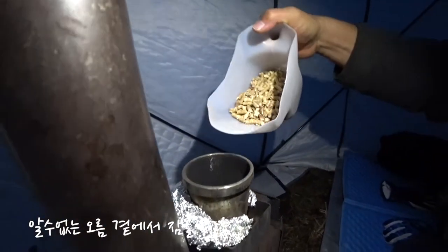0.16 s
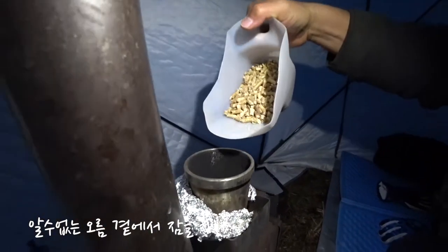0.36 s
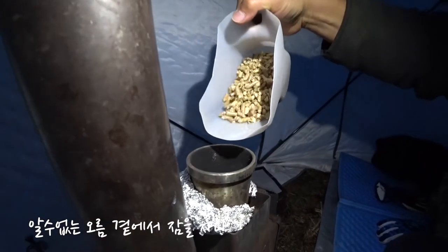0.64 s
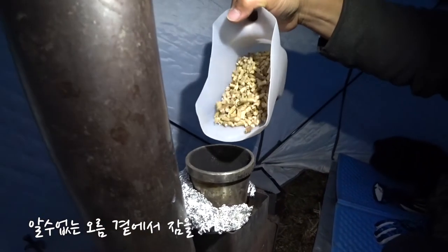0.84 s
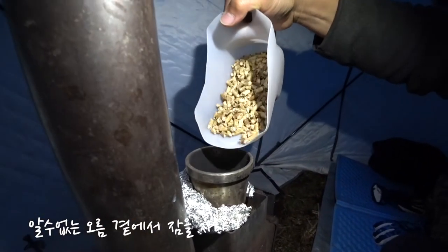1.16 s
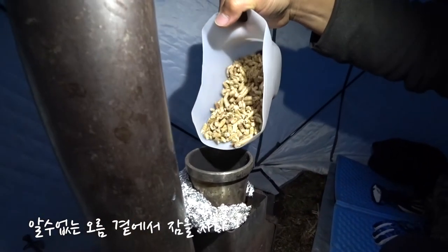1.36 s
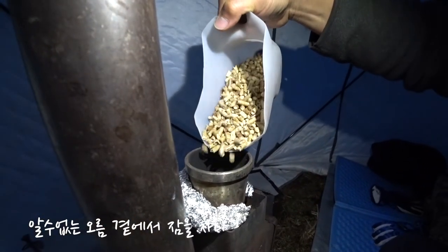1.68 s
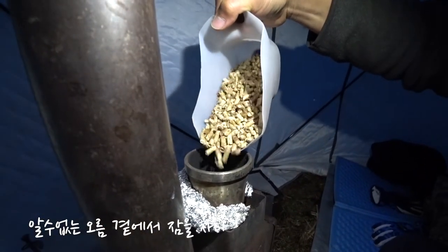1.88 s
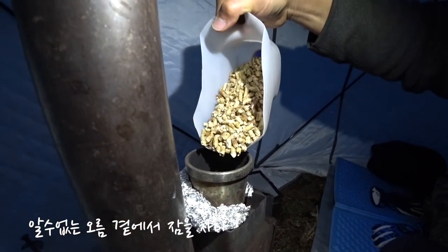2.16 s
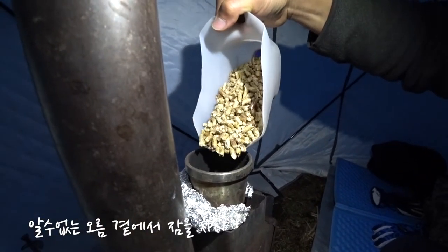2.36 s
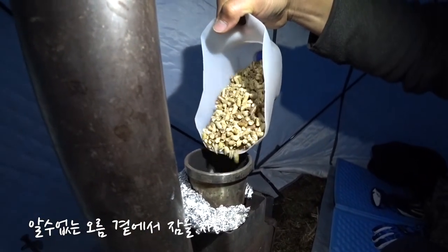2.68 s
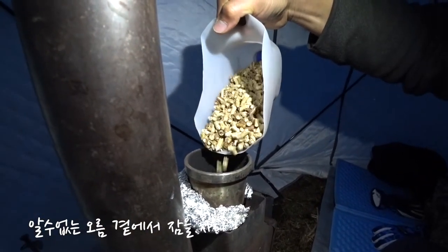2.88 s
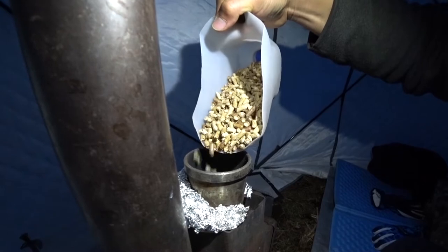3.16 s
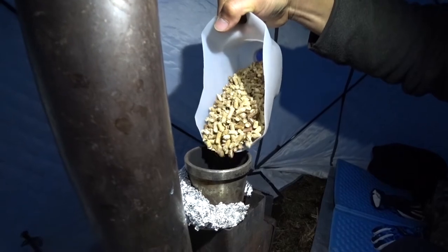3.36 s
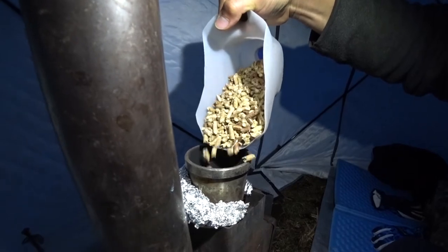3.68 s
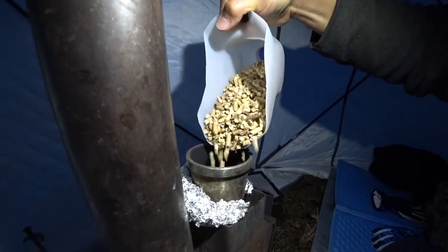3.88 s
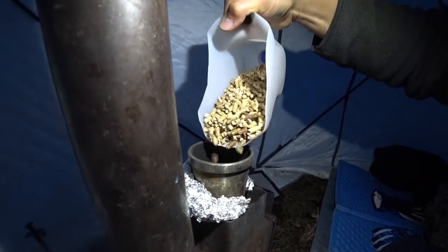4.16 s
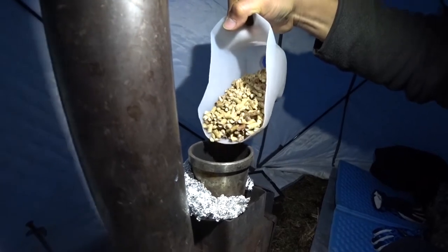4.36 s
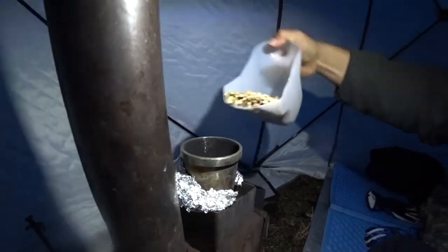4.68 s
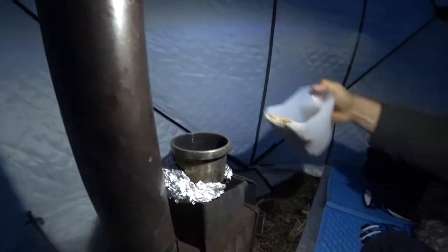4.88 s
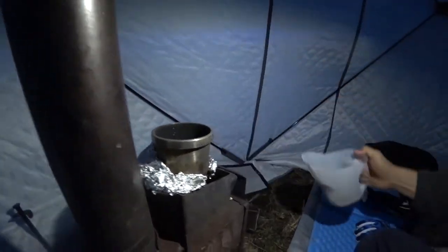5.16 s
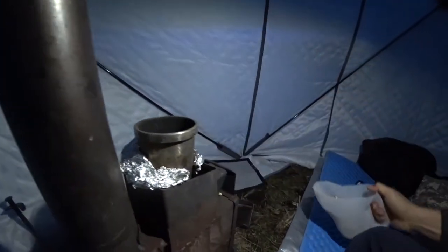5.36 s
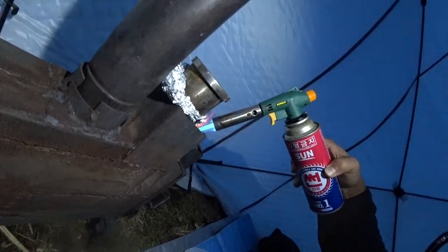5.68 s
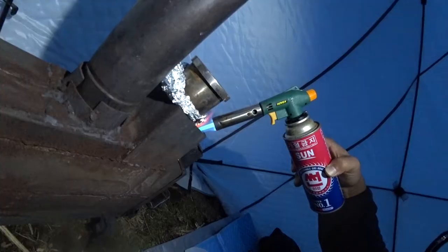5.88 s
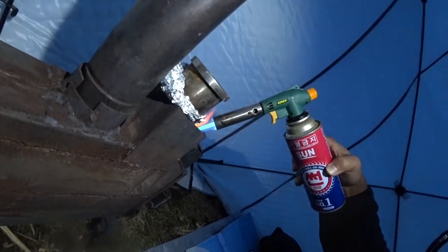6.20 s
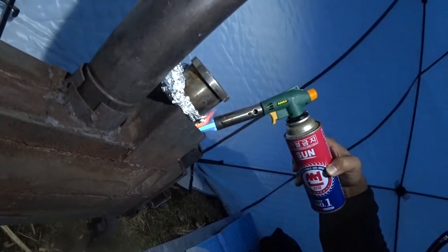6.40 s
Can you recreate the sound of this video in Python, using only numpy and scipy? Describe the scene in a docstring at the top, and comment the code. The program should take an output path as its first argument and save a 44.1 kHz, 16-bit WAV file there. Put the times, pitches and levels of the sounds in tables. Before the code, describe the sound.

Inside a small cloth tent, close to a small camera microphone with a wide stereo spread, the quiet is a soft airy noise with very faint thin whines. From about 0.1 s a few wood pellets tick in a plastic scoop; between 0.6 and 1.6 s they slide and clack more busily, dry and hollow. At 1.7 s they begin dropping into a steel feed tube: bright, irregular pings and ticks, densest from about 1.9 to 3.3 s with a brief lull near 2.3-2.5 s, over rustling plastic and low, short metallic landings in the stove box. The drops continue more sparsely to about 4.5 s, with a last one near 4.8 s. From 4.9 to 5.4 s the remaining load swishes back with a slight hollow boom. Soft faint knocks follow around 5.6-5.8 s, and a gas torch hisses weakly and steadily from 5.7 s to the end, with another tiny knock near 6.35 s.

```python
"""Inside a small tent: wood pellets shift and slide in a plastic scoop, close to a small camera microphone.
They drop one after another into the steel feed tube of a stove and land in its box; each blow rings
the modes of plastic, tube or box. The scoop is tipped back and set down with soft hollow knocks,
then a gas torch, made of resonant noise, hisses faintly. Faint whines lie in the quiet, the cloth walls
return a short faint scatter, and the microphone spreads the sound wide by phase."""
import sys
import numpy as np
from scipy import signal
from scipy.fft import rfft, irfft
from scipy.io import wavfile
from scipy.ndimage import uniform_filter1d

SR = 44100
rng = np.random.default_rng(int(sys.argv[2]) if len(sys.argv) > 2 else 0)


def to_wav(sig):
    """Store sig (one row per channel, or 1-D mono) as 16-bit WAV at the path in sys.argv[1].

    Samples outside -1..1 are clipped; the rate is SR.
    """
    pcm = np.clip(np.atleast_2d(sig), -1, 1) * 32767
    pcm = np.round(pcm).astype(np.int16)
    wavfile.write(sys.argv[1], SR, pcm.T)  # frames by channels


N = 287973
HZ = np.fft.rfftfreq(N, 1 / SR)
T = np.arange(N) / SR

# All levels are relative; blows are shared among the modes they ring.
# small pellets pattering down the tube: [t/s, level/dB of the smallest tap]
STREAM_LEVEL = [(1.68, -46.5), (2.07, -46), (2.24, -48), (2.3, -55.5), (2.58, -49), (2.66, -37),
                (2.88, -38), (2.98, -39), (3.3, -39.5), (3.9, -44), (4.04, -45.5), (4.1, -43), (4.2, -42.5),
                (4.42, -39.5), (4.52, -61)]
# pellets striking the tube wall: [t/s, level/dB, f/Hz favoured by the spot]
TUBE_STRIKES = [(1.718, -21, 3240), (1.743, -14.5, 7000), (1.855, -20.5, 5850), (1.887, -24, 4300),
                (1.9037, -26, 4160), (1.9596, -12, 8570), (2.025, -15.5, 6750), (2.041, -21, 1480),
                (2.0448, -28, 6250), (2.064, -16, 3010), (2.086, -12, 7500), (2.119, -17, 6200),
                (2.1234, -16, 8500), (2.154, -14.5, 8400), (2.2017, -22.5, 6000), (2.2305, -20, 3800),
                (2.329, -31.5, 4100), (2.3282, -26.5, 2550), (2.479, -30.5, 3330), (2.5578, -23, 4700),
                (2.6132, -11, 8900), (2.645, -15.5, 7700), (2.6574, -10.5, 4750), (2.69, -22, 8240),
                (2.7481, -21.5, 8700), (2.761, -15.5, 8500), (2.7932, -14, 6430), (2.815, -15, 8600),
                (2.825, -15, 11400), (2.853, -28.5, 8800), (2.874, -22.5, 4750), (2.935, -29, 8830),
                (2.957, -26, 4800), (2.988, -45, 8600), (3.0402, -14.5, 11100), (3.103, -24.5, 6350),
                (3.109, -19.5, 8800), (3.1613, -25.5, 12000), (3.1686, -17.5, 6540), (3.1949, -25, 9900),
                (3.245, -22, 4460), (3.279, -25.5, 8400), (3.317, -23, 11300), (3.323, -19.5, 8450),
                (3.3492, -27, 8300), (3.375, -28, 6750), (3.4461, -24.5, 4470), (3.484, -16, 8130),
                (3.532, -20.5, 6600), (3.5705, -23.5, 4770), (3.6347, -18.5, 4840), (3.663, -22.5, 8260),
                (3.695, -24, 11300), (3.728, -20.5, 8240), (3.761, -23.5, 9000), (3.837, -24, 8700),
                (3.8684, -21, 6550), (3.903, -23.5, 7300), (3.9714, -25.5, 3110), (3.9966, -23, 8700),
                (4.06, -33, 4840), (4.219, -42, 7200), (4.31, -30, 2250), (4.122, -18.5, 5130),
                (4.268, -28, 4830), (4.308, -31, 4800), (4.396, -26.5, 7340), (4.437, -16.5, 6600),
                (4.4732, -15.5, 4550), (4.6492, -40, 8900), (4.678, -37.5, 2260), (4.737, -44.5, 7000),
                (4.8096, -28, 4900)]
# main modes of the feed tube: [f/Hz, level/dB, t60/s]
TUBE_MODES = [(1478, -9, .06), (2250, -10, .13), (3016, -7, .14), (2550, -5, .07), (3102, -12, .6),
              (3215, -11, .14), (3365, -6, .1), (3720, -6, .1), (4110, -3.5, .12), (4280, -8, .25),
              (4345, -5, .1), (4735, -8, .12), (4840, -8, .12), (5350, -6, .1), (5604, -10, .12),
              (6378, -4, .1), (6665, -8, .12), (7260, -8, .09), (7835, -8, .09), (8065, -6, .1),
              (8302, -6, .1), (8819, -4, .18), (9126, -12, .09), (9880, -8, .06), (11300, -2, .07),
              (11560, -5, .05)]
# outline of its many lesser modes: [f/Hz, level/dB, t60/s]
STEEL_OUTLINE = [(1187, -21, 0.25), (2830, -18, 0.17), (4560, -8.5, 0.066), (6970, -2.5, 0.041),
                 (10760, -7.5, 0.039), (15613, -21.5, 0.048)]
# pellets sliding in the scoop, first tilt to setting down: [t/s, level/dB of the smallest tick]
SLIDE_LEVEL = [(.05, -83), (.27, -59.5), (.33, -55), (.49, -53.5), (.57, -57), (.62, -52), (.8, -49),
               (1.1, -53), (1.25, -50.5), (1.4, -49), (1.7, -50.5), (2.07, -47.5), (2.25, -51), (2.38, -54),
               (2.44, -52), (2.54, -52), (2.63, -48.5), (3.2, -50), (3.95, -50), (4.09, -55), (4.3, -49.5),
               (4.55, -56), (4.85, -56), (4.92, -48), (5.08, -46.5), (5.2, -47.5), (5.29, -53),
               (5.37, -55.5), (5.41, -89)]
# single pellets clacking on the scoop: [t/s, level/dB, treble against it/dB, f/Hz favoured by the spot]
SCOOP_CLACKS = [(0.0962, -30.5, -28.5, 1300), (0.146, -34.5, -36, 1160), (0.2462, -39.5, -11, 3150),
                (0.2868, -27, -37, 2820), (0.4446, -40, -8, 2900), (0.497, -30, -20, 1090),
                (0.606, -22, -18, 1120), (.6548, -34, -10, 2900), (0.6784, -28, -7, 1220),
                (0.698, -39, 12, 2100), (0.7204, -36.5, 16, 5070), (0.724, -25.5, 2.5, 2980),
                (0.765, -24, -2.5, 1680), (0.7876, -37.5, 37, 2920), (0.8075, -17, -15.5, 1750),
                (0.845, -28.5, -7, 3070), (0.8746, -30, -8, 1690), (.916, -27.5, 9, 2860),
                (0.954, -19.5, -15, 1180), (0.984, -20, -7, 2200), (1, -40, 25, 2740),
                (1.0237, -20.5, -21, 1910), (1.0526, -29, 1, 5300), (1.0732, -29.5, -4, 4600),
                (1.0978, -27.5, -8, 2520), (1.1151, -22, -11, 2290), (1.1338, -22.5, -18, 3100),
                (1.151, -30, -11, 2980), (1.159, -22.5, 11, 3620), (1.206, -20, -39, 560),
                (1.3937, -17, -35, 3240), (1.4383, -21, -15, 1190), (1.4715, -15, -36, 3050),
                (1.5047, -20, -16, 2830), (1.534, -19.5, -20, 1150), (1.6728, -16, -21, 1170),
                (5.017, -32, 5, 2660), (5.039, -35, 10, 3500), (5.07, -30, 8, 2720), (5.081, -30, 18, 2460),
                (5.109, -24, 3.5, 2610), (5.1602, -24.5, 1, 3800), (5.219, -22, -20, 2530),
                (5.3166, -40, 31.5, 3860), (5.3516, -34.5, 12, 3170), (5.368, -32, 0.5, 1480)]
# outline of the scoop modes: [f/Hz, level/dB, t60/s]
PLASTIC_OUTLINE = [(340, -40, 0.035), (482, -10.5, 0.043), (1060, -6.5, 0.036), (2770, -4.5, 0.033),
                   (3900, -4.5, 0.016), (7380, -1, 0.013), (15700, -26.5, 0.0094)]
# the bowl booming as the load slides back: [t/s, level/dB]
BOOM_LEVEL = [(4.86, -71), (4.92, -53), (5.06, -58), (5.11, -55), (5.17, -47.5), (5.21, -58.5), (5.26, -54),
              (5.33, -79)]
# pellets landing in the stove box: [t/s, level/dB, f/Hz favoured by the spot]
BOX_LANDINGS = [(2.017, -28, 743), (2.124, -39, 820), (2.232, -35, 1077), (2.479, -33.5, 980),
                (2.695, -31, 745), (2.797, -37, 980), (2.86, -40, 765), (2.983, -35, 785),
                (3.065, -29, 720), (3.195, -28.5, 830), (3.267, -38, 810), (3.376, -37.5, 845),
                (3.542, -31.5, 830), (3.642, -26, 770), (3.874, -31, 823), (4.125, -32, 980),
                (4.187, -27.5, 764), (4.278, -29, 790), (4.337, -38.5, 795), (4.476, -36.5, 1077),
                (4.683, -39.5, 800), (4.813, -36.5, 826)]
# modes of the box: [f/Hz, level/dB, t60/s]
BOX_MODES = [(600, -12, .07), (726.5, -5, .24), (745, -6, .2), (772, -5, .1), (805, -8, .45),
             (826, -5, .15), (872, -3, .1), (985, -4, .07), (1077, -11, .7)]
# soft hollow knocks: [t/s, level/dB, f/Hz, rustle against it/dB]
SOFT_KNOCKS = [(0.327, -50.5, 830, -10), (5.625, -53.5, 810, 0), (5.672, -57, 490, -12),
               (5.701, -62.5, 1566, 3), (5.762, -50, 856, -22), (5.802, -56.5, 496, -21),
               (6.352, -50, 866, -26), (6.394, -56.5, 716, -22)]
# torch nozzle whistles and broad hiss: [f/Hz, width/Hz, level/dB]
TORCH_JET = [(3030, 190, -72), (5220, 440, -83), (6810, 480, -81.5), (4970, 8100, -79)]
# spectrum of the quiet in the tent: [f/Hz, level/dB per hertz]
AIR_SPECTRUM = [(25, -15), (60, -21.5), (110, -1.5), (150, -1.5), (200, -5), (500, -4), (900, -6),
                (1500, -8.5), (2300, -12.5), (4500, -19), (9000, -20.5), (16000, -19)]
# faint steady whines: [f/Hz, width/Hz, level/dB]
WHINE_TONES = [(1200, 85, -76.5), (9900, 100, -87.5), (12300, 70, -85)]
# channel difference against channel sum: [f/Hz, level/dB, phase lead/rad]
PORT_SPREAD = [(59.4, -10, 1.8), (140, -5.5, 2.4), (291, 3, 2.04), (580, 7.5, 1.88), (1240, 9.5, 1.83),
               (2376, 6.5, 1.78), (4780, 2.5, 1.93), (9600, -2.5, 2.13), (16000, -7, 2.14)]

# a harder strike is a shorter contact, so the lower modes gain less than the upper ones
FIRM_DB, FIRM_LOW_DB, LOW_PER_DB, PATTER_LOW_DB = -28.5, -1, -0.2877, -4.5
# a pellet is a short rod: after one end strikes, the other slaps down a moment later
SLAP_MIN_S, SLAP_MAX_S, SLAP_DB, SLAP_LUCK_DB = .003, .014, -9, 3.
# a tube is never quite round: each mode has a shorter twin a little off in pitch
TWIN_SPLIT, TWIN_DECAY, TWIN_DB = 0.0114, 0.61, -2
# the faster the slide, the brighter; brighter during the pour, when steel rattle from the tube mixes in
BRISK_DB, BRISK_TREBLE_DB, TREBLE_PER_DB, POUR_TREBLE_DB = -46.5, -1.5, 3.5, 10
THIN_DB, FULL_DB = -92, -54  # stream levels of a trickle and of a full pour
POUR_THINS = .85  # in a full pour, this share of the ticks gives way to fewer, larger knocks
FALL_S, MURMUR_DB = 0.077, -13.5  # the stream reaches the box this late and this far below its patter
JET_ON_S, JET_RISE_S = 5.72, 0.042
AIR_DB, BREATH_DB = -64.5, 0.57  # level of the quiet and its RMS drift
SWELL_S, SWELL_LENGTH_S, SWELL_DB = 5.52, .09, 8.  # the lowest whine swells briefly
EDGE_HZ = 15900  # upper band limit of the microphone


def tube():
    """Strikes on the steel tube, each with its slap, over a patter of small pellets."""
    at, size_db = scattered(per_s=82.0, spread_db=4.0)
    strike_s, peak_db, strike_hz = np.transpose(TUBE_STRIKES)
    wait, luck = rng.random((len(strike_s), 2)).T
    slap_s = strike_s + SLAP_MIN_S + (SLAP_MAX_S - SLAP_MIN_S) * wait
    slap_db = peak_db + SLAP_DB + SLAP_LUCK_DB * (2 * luck - 1)
    large_db = np.r_[peak_db, slap_db]
    level_db = np.r_[large_db, size_db + level_at(STREAM_LEVEL, at)]
    firm_low_db = FIRM_LOW_DB + LOW_PER_DB * (large_db - FIRM_DB)
    low_db = np.r_[firm_low_db, np.full(len(at), PATTER_LOW_DB)]
    patter_hz = rng.uniform(3000, 11000, N)[:len(at)]
    spot_hz = nearest(TUBE_MODES, np.r_[strike_hz, strike_hz, patter_hz])

    def colour_db(hz):
        low = below(hz, 6400, 2.0) * low_db
        favoured = 5.7 * near(hz, spot_hz, 0.21)
        exact = 17.7 * below(hz, 4900, 1.9) * (hz == spot_hz)
        return level_db + low + favoured + exact

    twins = [(hz * (1 + TWIN_SPLIT * rng.standard_normal()), db + TWIN_DB, t60 * TWIN_DECAY)
             for hz, db, t60 in TUBE_MODES]
    modes = list(TUBE_MODES) + twins + many(STEEL_OUTLINE, count=120)
    return struck(np.r_[strike_s, slap_s, at], colour_db, modes, 6.72, .0018, spot_hz, 0.01)


def scoop():
    """Many pellets rub and tick on the plastic, single ones clack, and the bowl booms as a resonance."""
    at, size_db = scattered(per_s=2200., spread_db=4.5)
    clack_s, peak_db, bright_db, clack_hz = np.transpose(SCOOP_CLACKS)
    slide_db = level_at(SLIDE_LEVEL, at)
    pour = np.clip((level_at(STREAM_LEVEL, at) - THIN_DB) / (FULL_DB - THIN_DB), 0, 1)
    share = 1 - POUR_THINS * pour
    heard = rng.random(N)[:len(at)] < share
    tick_db = size_db + slide_db - 8.0 * np.log10(share)  # the fewer, the larger
    level_db = np.r_[peak_db, np.where(heard, tick_db, -150)]
    slide_treble_db = BRISK_TREBLE_DB + TREBLE_PER_DB * (slide_db - BRISK_DB) + POUR_TREBLE_DB * pour
    treble_db = np.r_[bright_db, slide_treble_db]
    spot_hz = np.r_[clack_hz, rng.uniform(900, 5000, len(at))]

    def colour_db(hz):
        treble = (1 - below(hz, 4100, 0.65)) * treble_db
        return level_db + treble + 10.36 * near(hz, spot_hz, 0.23)

    modes = many(PLASTIC_OUTLINE, count=120)
    rattle = struck(np.r_[clack_s, at], colour_db, modes, 5.43, .0008, spot_hz, 0.099)
    return rattle + amp(level_at(BOOM_LEVEL, T)) * whistle(563, 150)


def box():
    """Landings ring the low plates of the stove; the stream keeps them murmuring."""
    at, size_db = scattered(per_s=140., spread_db=1.5)
    land_s, peak_db, land_hz = np.transpose(BOX_LANDINGS)
    murmur_db = size_db + level_at(STREAM_LEVEL, at - FALL_S) + MURMUR_DB
    level_db = np.r_[murmur_db, peak_db - 7.5]
    murmur_hz = rng.uniform(700, 900, N)[:len(at)]
    spot_hz = nearest(BOX_MODES, np.r_[murmur_hz, land_hz])

    def colour_db(hz):
        return level_db + 6.8 * near(hz, spot_hz, 0.14) + 5.2 * (hz == spot_hz)

    return struck(np.r_[at, land_s], colour_db, BOX_MODES, 4.3, .006, spot_hz, 0.047)


def knocks():
    """Each knock is a short soft-edged ring of two partials with a puff of rustling noise."""
    out, t = np.zeros(N), T[:2600]
    cloth = signal.butter(1, [2200, 8000], "band", fs=SR, output="sos")
    ring_shape = np.exp(-((t - .009) / 0.0042) ** 2)
    puff_shape = np.exp(-((t - .008) / 0.028) ** 2)
    for s, peak_db, hz, rustle_db in SOFT_KNOCKS:
        ring = np.sin(2 * np.pi * hz * t) + 0.5 * np.sin(2 * np.pi * 0.52 * hz * t)
        rustle = amp(rustle_db) * signal.sosfilt(cloth, rng.standard_normal(len(t)))
        out[round(s * SR):][:len(t)] += amp(peak_db) * (ring * ring_shape + rustle * puff_shape)
    return out


def torch():
    """Gas whistles through the nozzle at an even pressure, so each whistle holds its level."""
    def held(x):
        return evened(x / np.sqrt(abs(uniform_filter1d(x ** 2, size=900)) + .1))

    opening = np.clip((T - JET_ON_S) / JET_RISE_S, 0, 1)
    return opening * sum(amp(db) * held(whistle(hz, width)) for hz, width, db in TORCH_JET)


def air():
    """The quiet of the tent: noise breathing in level, its treble wide and diffuse."""
    hz, db = np.transpose(AIR_SPECTRUM)
    a, b = rfft(rng.standard_normal((2, N)))
    alike = np.clip(over_hz([600, 1300, 12000], [.95, .45, .4]), 0, 1)
    second = alike * a + np.sqrt(1 - alike ** 2) * b
    both = irfft(np.array([a, second]) * amp(over_hz(hz, db)), N)
    breath = evened(uniform_filter1d(uniform_filter1d(rng.standard_normal(N), 3000), 3000))
    return amp(AIR_DB + BREATH_DB * breath) * evened(both) + whines()


def whines():
    """Thin tones in the quiet, each a narrow band of noise; the lowest swells once."""
    low, *high = [amp(db) * whistle(hz, width) for hz, width, db in WHINE_TONES]
    swell_db = SWELL_DB * np.exp(-((T - SWELL_S) / SWELL_LENGTH_S) ** 2)
    return low * amp(swell_db) + sum(high)


def tent(x):
    """Cloth walls return a short faint scatter, decaying noise that differs at each port."""
    t = T[300:5000]  # the first return comes 300 samples (7 ms) late
    noise = rng.standard_normal((2, len(t))) * amp(-60 * t / 0.086)
    tail = signal.lfilter([1], [1, -.1], noise)
    tail = np.pad(tail / np.linalg.norm(tail[0]), ((0, 0), (300, 0)))
    return signal.oaconvolve(x[None], tail, axes=1)[:, :N]


def struck(s, colour_db, modes, luck_db, spread_s, spot_hz, sure_octaves):
    """Each blow rings its spot's pitch surely, other modes by luck; the wave takes a moment to spread."""
    luck = rng.standard_normal((len(s), len(modes)))
    late = rng.exponential(1, luck.shape) ** 1.5
    side = rng.choice([-1., 1.], luck.shape)
    out = np.zeros(N)
    for k, (hz, db, t60) in enumerate(modes):
        turn, r = 2 * np.pi * hz / SR, amp(-60 / (t60 * SR))
        at = np.minimum(np.round((s + spread_s * late[:, k]) * SR).astype(int), N - 1)
        unsure = 1 - near(hz, spot_hz, sure_octaves)
        blow_db = db + colour_db(hz) + luck_db * np.clip(luck[:, k], -3.0, 1.4) * unsure
        blows = np.bincount(at, side[:, k] * amp(blow_db) * np.sin(turn), N)
        out += signal.lfilter([1], [1, -2 * r * np.cos(turn), r * r], blows)  # one decaying sine per blow
    return out / np.sqrt(len(modes))  # the blow is shared among all the modes


def scattered(per_s, spread_db):
    """Times and sizes in dB of a random rain of contacts; a few are large."""
    s = T[rng.random(N) < per_s / SR]
    return s, spread_db * np.minimum(rng.exponential(1, N)[:len(s)], 4)


def many(outline, count):
    """Fills an outline with modes at uneven pitches; the long ringers are the fainter."""
    hz, db, t60 = np.transpose(outline)
    place = ((np.arange(count) + rng.random(count)) / count) ** 1.3
    mode_hz = hz[0] + (hz[-1] - hz[0]) * place
    longer_db = 1.96 * np.clip(rng.standard_normal(count), -2.5, 1.1)
    mode_db = np.interp(mode_hz, hz, db) - 1.465 * longer_db
    return list(zip(mode_hz, mode_db, np.interp(mode_hz, hz, t60) * amp(longer_db)))


def whistle(hz, width):
    """Noise through one resonance, at unit RMS."""
    return evened(irfft(rfft(rng.standard_normal(N)) / (1 + (2 * (HZ - hz) / width) ** 2), N))


def below(hz, edge_hz, steep):
    """Near 1 well under the edge, falling towards 0 over it."""
    return 1 / (1 + (hz / edge_hz) ** steep)


def near(hz, spot_hz, octaves):
    """A bell of height 1 round the pitch that a spot favours."""
    return np.exp(-(np.log2(hz / spot_hz) / octaves) ** 2)


def nearest(modes, hz):
    """The pitch of the mode closest to each given pitch."""
    pitches = np.transpose(modes)[0]
    return pitches[abs(pitches - hz[:, None]).argmin(1)]


def level_at(curve, at):
    """A level curve in dB that is silent outside its span."""
    return np.interp(at, *np.transpose(curve), left=-150, right=-150)


def over_hz(hz, value):
    """Joins points by straight lines on a log-frequency axis."""
    return np.interp(np.log(HZ + 1), np.log(np.add(hz, 1)), value)


def amp(db):
    """Decibels to amplitude factor."""
    return 10 ** (np.asarray(db) / 20)


def evened(x):
    """Scales to unit RMS."""
    return x / np.sqrt(np.mean(x ** 2) + 1e-20)


def scene():
    """Close sources with their scatter off the cloth, the quiet and the torch, at two ports."""
    close = scoop() + tube() + box() + knocks()
    no_bass = signal.butter(4, 300, "high", fs=SR, output="sos")  # small things radiate no bass
    close = signal.sosfilt(no_bass, close)
    return close + amp(-12.0) * tent(close) + air() + torch()


def record(dry):
    """One port feeds both channels alike, the other, turned in phase, oppositely; then the band limit."""
    hz, db, ahead = np.transpose(PORT_SPREAD)
    turned = amp(over_hz(hz, db)) * np.exp(1j * over_hz(hz, ahead))
    side = irfft(rfft(dry[1]) * turned, N)
    wide = np.array([dry[0] + side, dry[0] - side])
    band = signal.firwin(255, EDGE_HZ, window=("kaiser", 8), fs=SR)
    return signal.oaconvolve(wide, band[None], "same")


dry = scene()
out = record(dry)
to_wav(out)
```